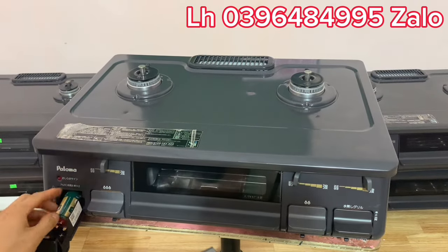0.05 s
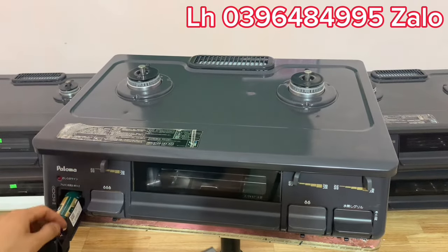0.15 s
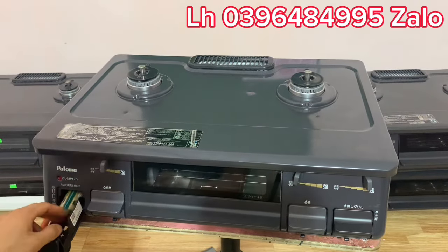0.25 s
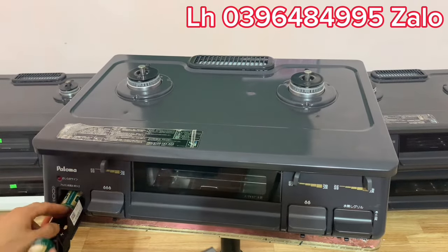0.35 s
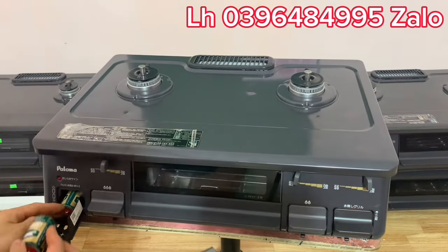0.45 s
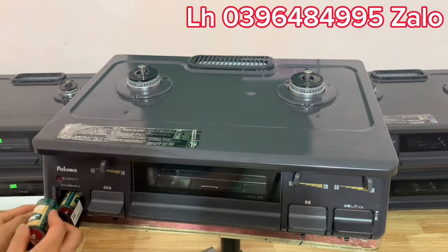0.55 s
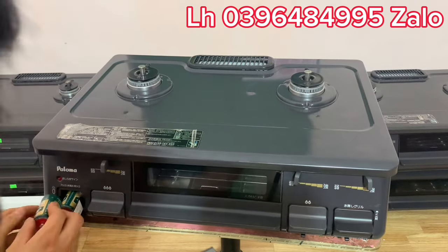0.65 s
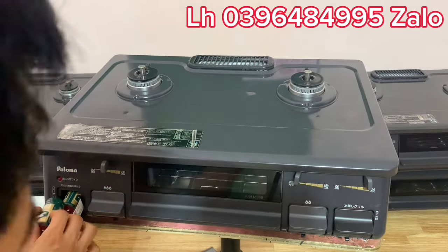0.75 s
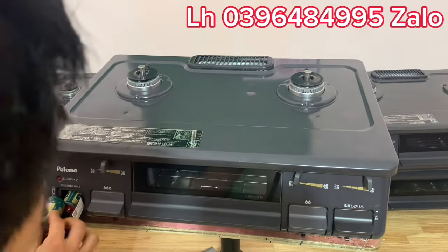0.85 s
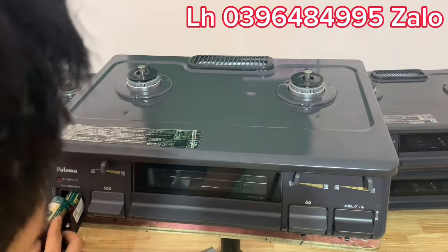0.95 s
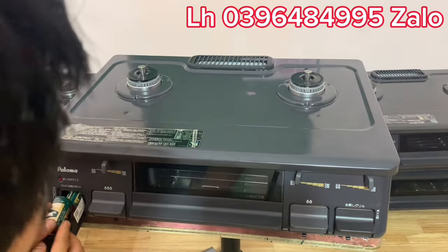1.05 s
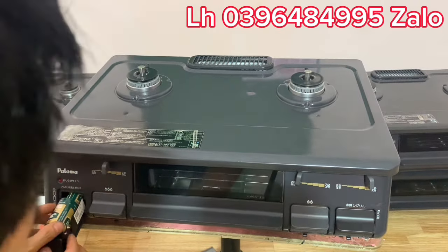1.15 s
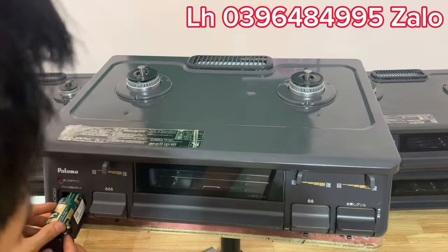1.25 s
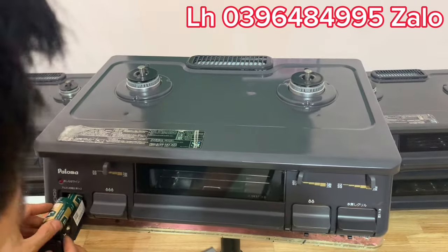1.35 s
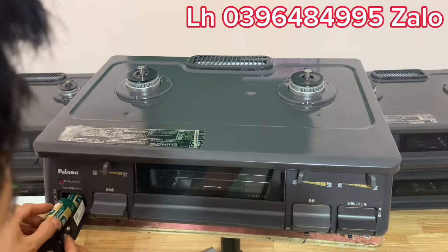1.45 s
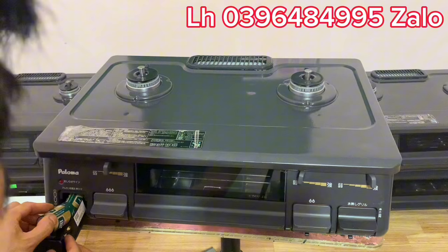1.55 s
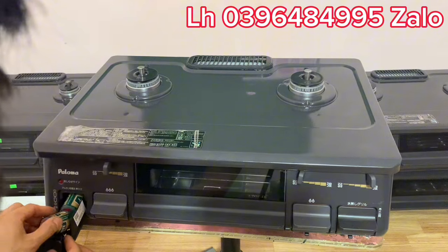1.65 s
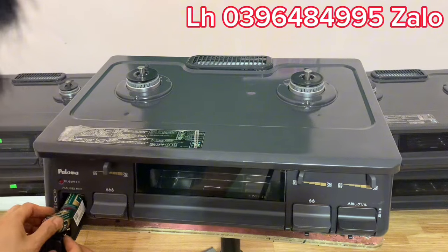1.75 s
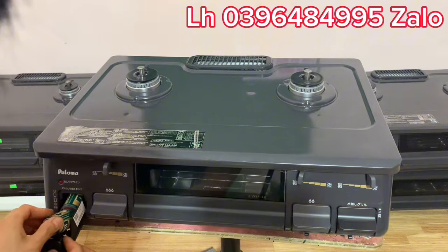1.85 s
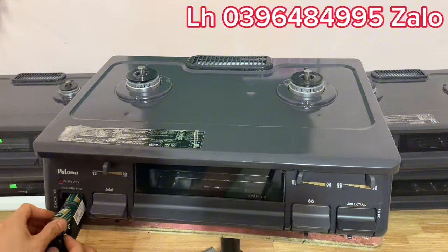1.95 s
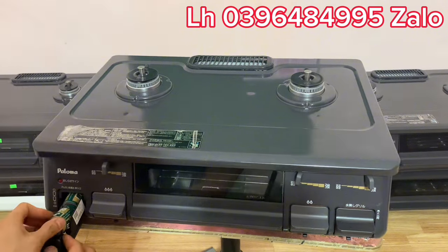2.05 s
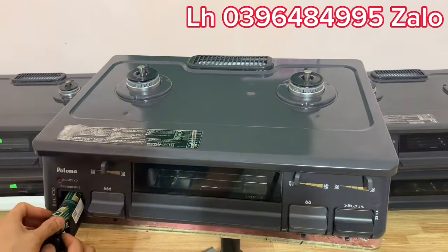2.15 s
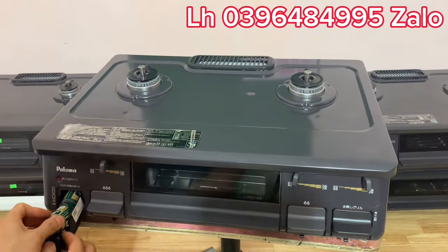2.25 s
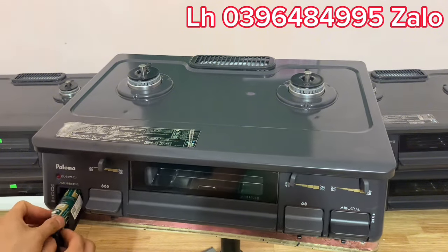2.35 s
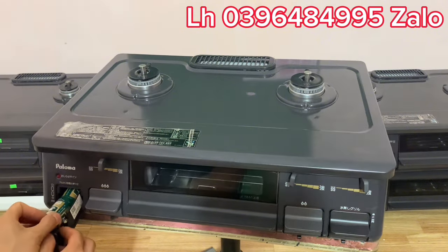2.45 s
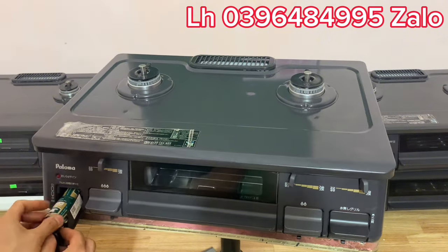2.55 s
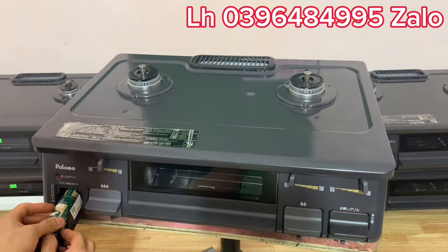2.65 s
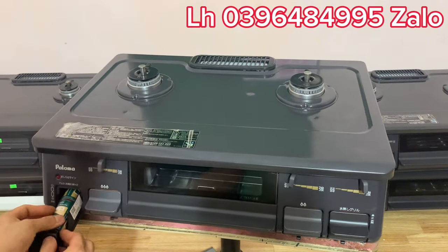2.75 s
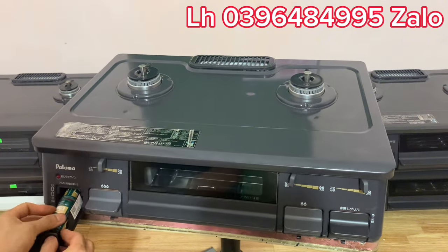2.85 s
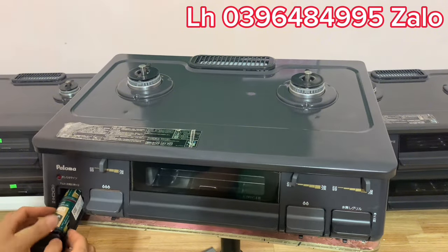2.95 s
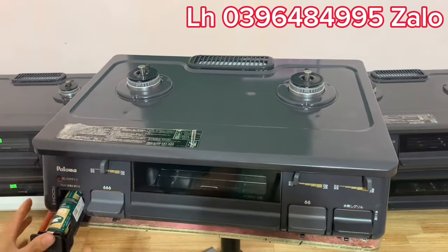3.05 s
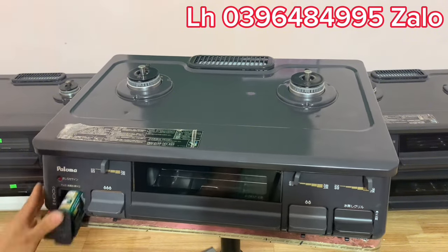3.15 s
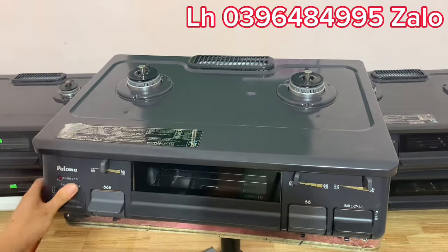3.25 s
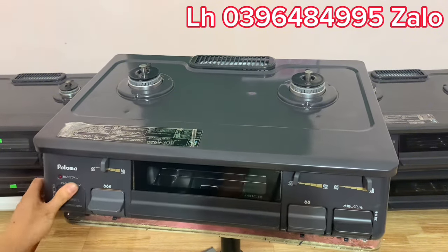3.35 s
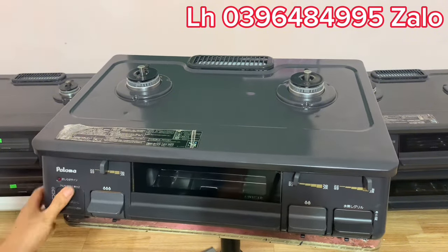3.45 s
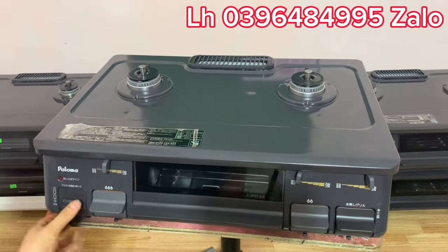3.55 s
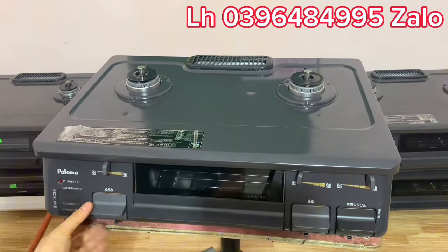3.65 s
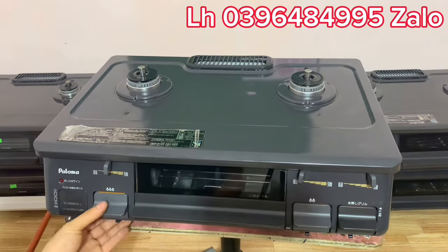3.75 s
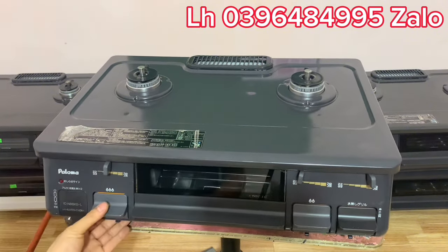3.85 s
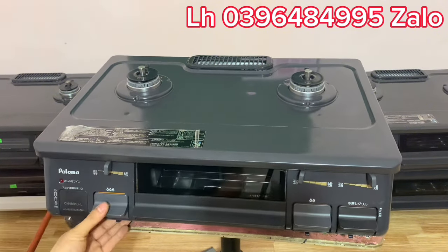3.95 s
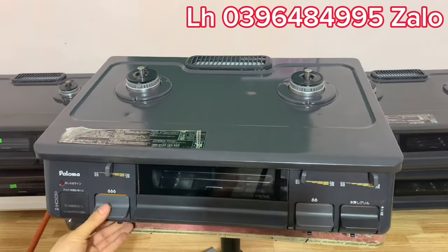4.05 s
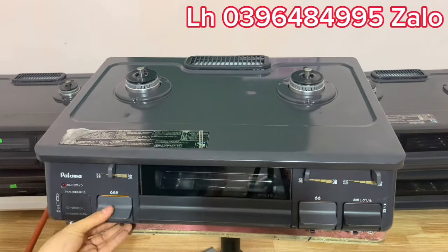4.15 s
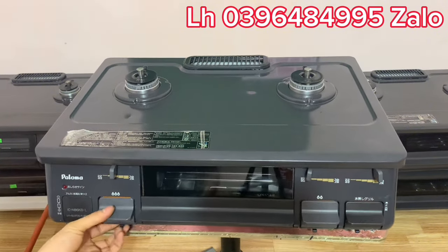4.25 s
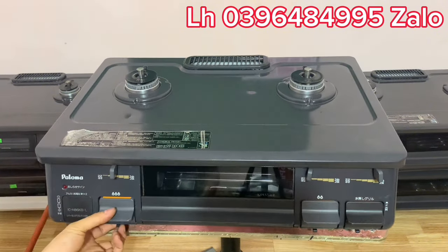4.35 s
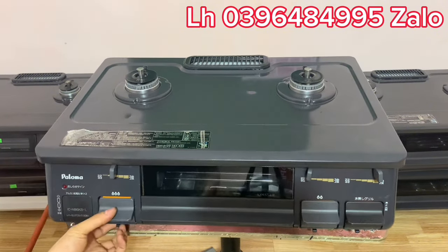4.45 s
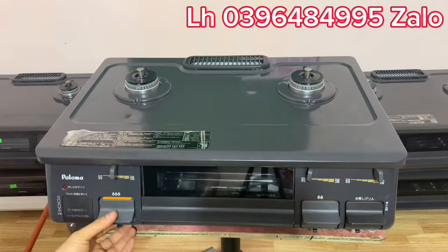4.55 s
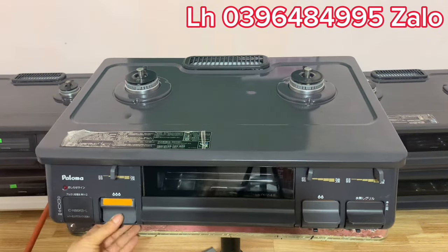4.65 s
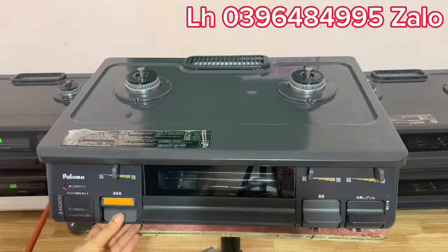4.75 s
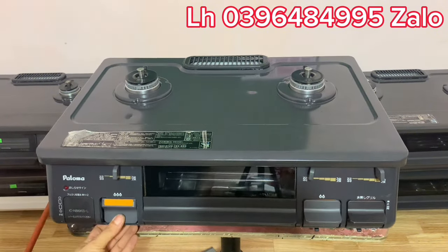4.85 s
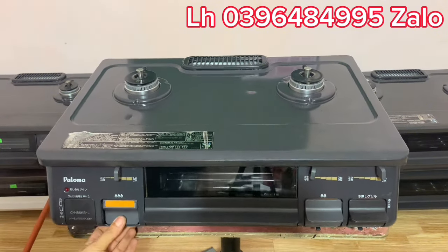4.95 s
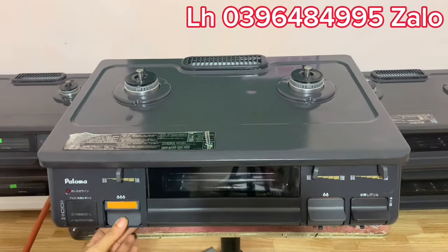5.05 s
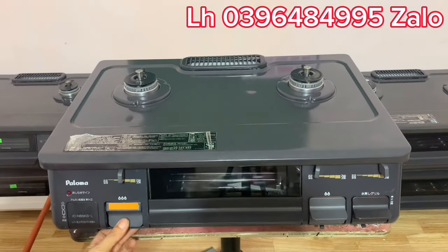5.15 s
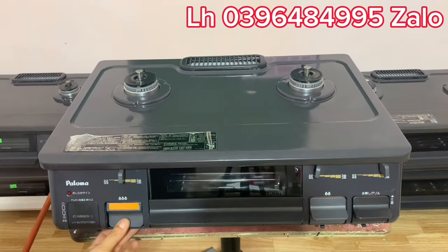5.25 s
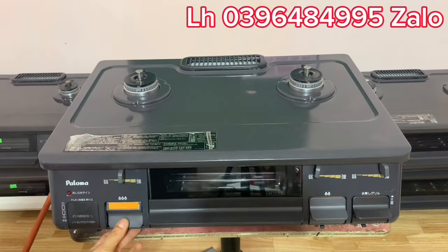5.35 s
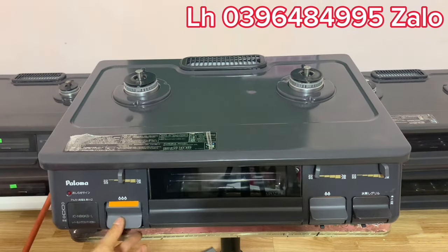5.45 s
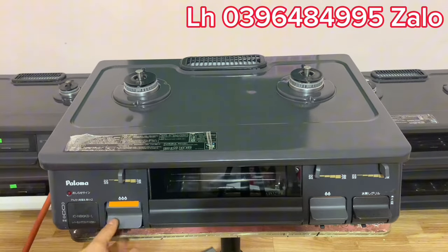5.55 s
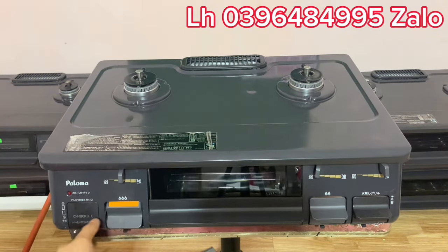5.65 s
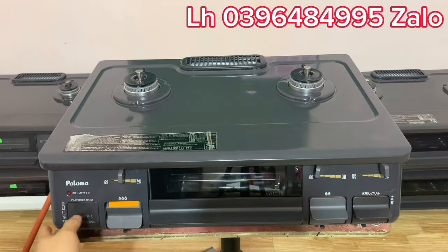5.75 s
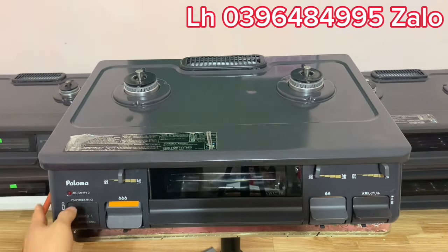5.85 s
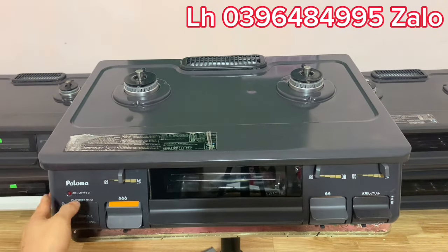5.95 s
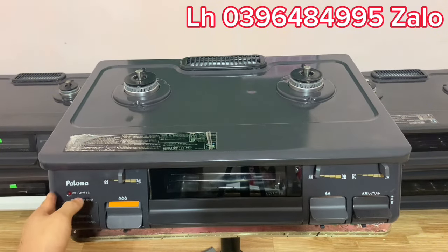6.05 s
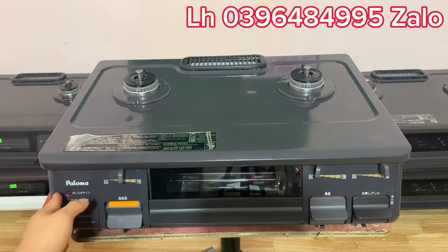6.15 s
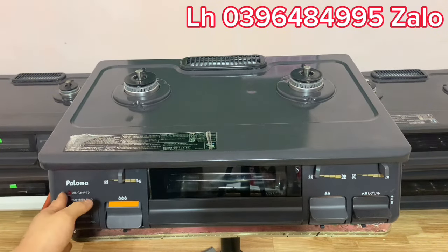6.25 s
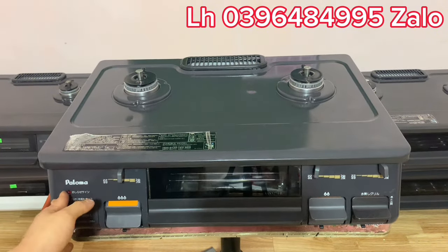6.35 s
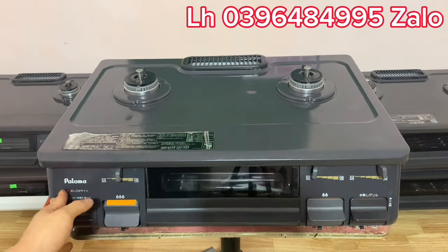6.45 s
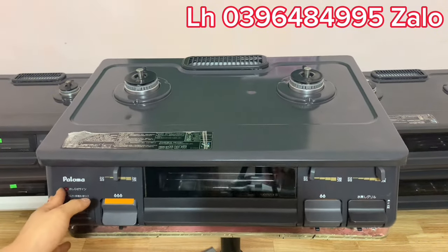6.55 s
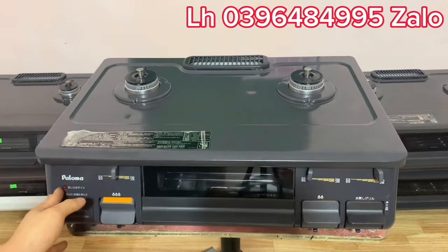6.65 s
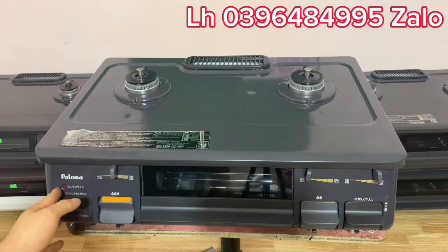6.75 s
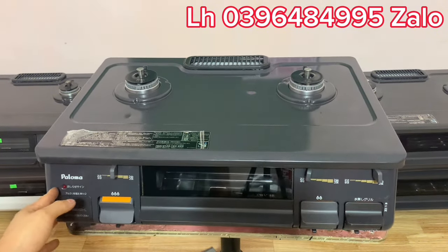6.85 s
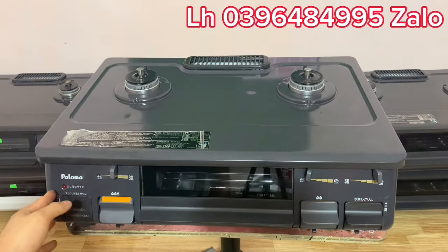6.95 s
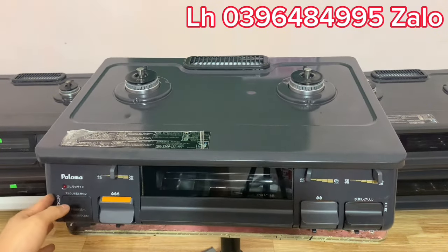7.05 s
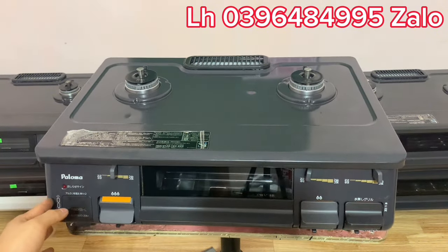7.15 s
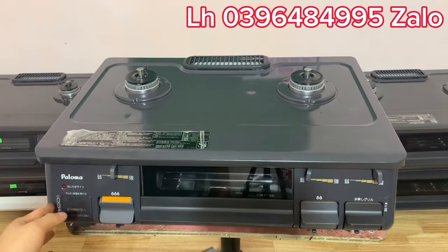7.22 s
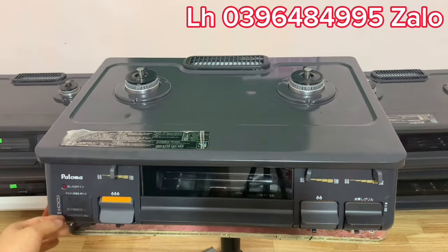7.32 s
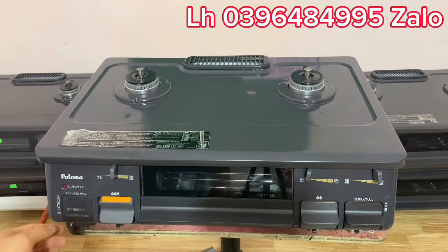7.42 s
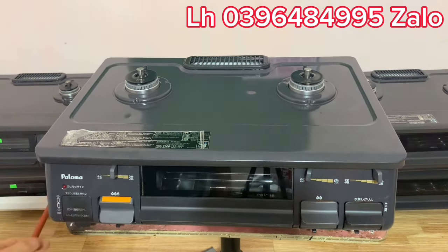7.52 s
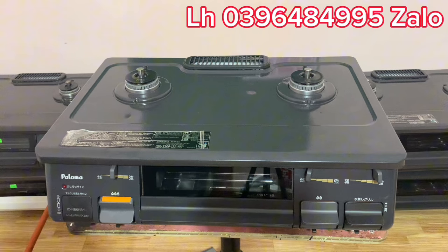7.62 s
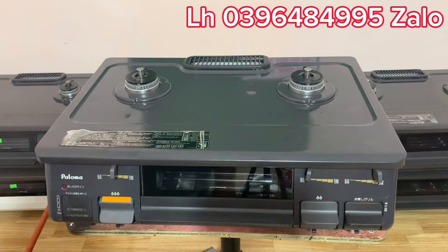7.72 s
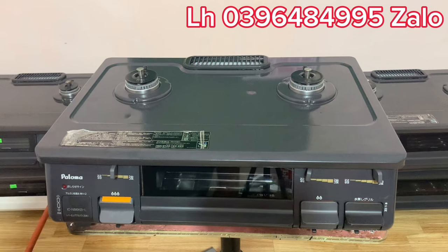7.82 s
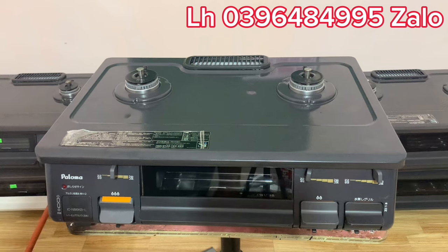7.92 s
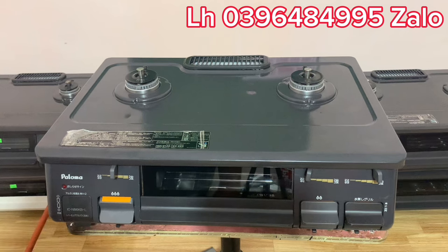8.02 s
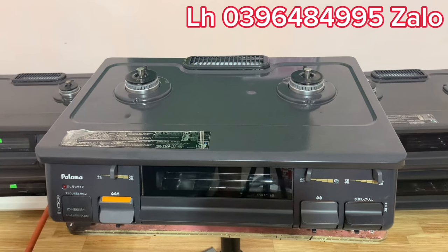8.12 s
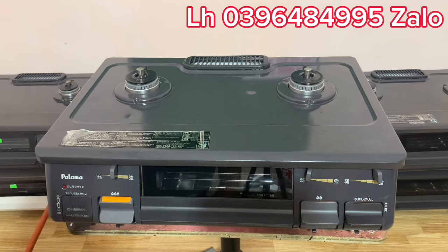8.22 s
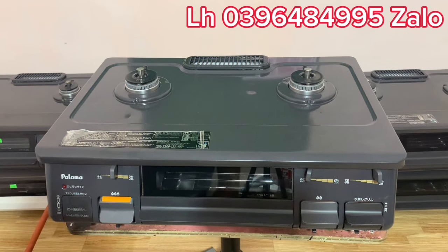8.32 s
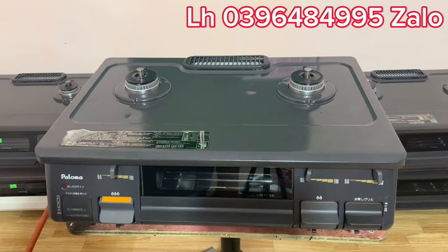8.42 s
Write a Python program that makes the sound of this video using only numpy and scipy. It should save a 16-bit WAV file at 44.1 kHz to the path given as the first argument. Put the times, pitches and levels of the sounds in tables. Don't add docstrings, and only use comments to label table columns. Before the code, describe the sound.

Indoors, close to a stereo handheld microphone, fingers rustle and batteries click and knock into the drawer of a hollow sheet-metal gas stove. The drawer slides and snaps shut with a hard crack, the casing is knocked, and a lever is hit and clunks down. Then bright igniter sparks tick evenly, about ten per second, to the end, without any flame sound. The room is hard and reverberant, with faint hum.

```python
import sys
import numpy as np
from scipy import signal
from scipy.fft import rfft, irfft
from scipy.io import wavfile

SR = 44100
rng = np.random.default_rng(int(sys.argv[2]) if len(sys.argv) > 2 else 0)


def rack_gain(trim_db):
    fader = np.asarray(trim_db, float)
    return 10 ** (fader / 20)


def file_out(sig):
    cols = np.atleast_2d(sig).T
    lim = np.clip(cols, -1, 1)
    pcm = np.round(lim * 32767).astype(np.int16)
    wavfile.write(sys.argv[1], SR, pcm)


N = 374100

# (frequency [Hz], level [dB])
RUMBLE = [(18, -51), (30, -19), (59, -7), (309, -7.5), (635, -15), (1000, -20), (1300, -63), (2200, -120)]
RUMBLE_DB, HISS_DB = -60.5, -63.5
# (start [s], end [s], level [dB])
THROBS = [(0.0, 0.5, -73), (0.77, 0.79, -58), (1.75, 2.17, -59), (2.42, 2.44, -56), (2.75, 3.15, -66),
          (3.27, 3.58, -57.5), (3.83, 4.42, -55), (4.68, 4.7, -53), (4.96, 4.99, -58), (5.2, 5.23, -60),
          (5.44, 5.5, -60), (5.9, 6.23, -60), (6.5, 6.54, -58), (6.75, 7.1, -61.5), (7.76, 7.82, -58),
          (8.2, 8.25, -57)]
# (start [s], frequency [Hz], level [dB])
WHINES = [
    (5.5, 118.4, -68.5),
    (4.5, 253, -70.5),
    (-2, 398, -72.5),
    (0, 500.6, -66.5),
]

# (start [s], end [s], level [dB])
RUSTLES = [(0.0, 0.05, -65), (0.39, 0.58, -43), (0.88, 1.03, -44), (1.28, 1.48, -43.5), (1.76, 1.8, -56),
           (2.38, 2.41, -40.5), (2.72, 2.78, -41), (3.22, 3.31, -37), (3.79, 3.84, -47.5),
           (4.25, 4.27, -51.5), (4.5, 4.75, -44.5), (5.36, 5.52, -63)]
# (start [s], end [s], level [dB])
SCRAPES = [(0.0, 0.03, -47), (0.8, 0.89, -45), (1.0, 1.04, -46.5), (1.88, 1.91, -59), (2.51, 2.53, -48),
           (3.22, 3.39, -44), (3.79, 3.82, -53.5), (4.38, 4.51, -51), (4.71, 4.75, -52), (5.37, 5.4, -57),
           (5.45, 5.47, -51)]
RUSTLE_FADE_DB_PER_S, SCRAPE_FADE_DB_PER_S, THROB_FADE_DB_PER_S = 90.5, 150, 145
# (start [s], loudest [s], end [s], level [dB])
SLIDES = [
    (3.13, 3.193, 3.18, -41),
    (4.628, 4.671, 4.678, -33.5),
]

# (time [s], hollow body [dB], panel ring [dB rel], bright crack [dB rel])
BUMPS = [(0.0004, -39.5, -3.5, -57), (0.232, -47.5, -3, -11), (0.4887, -57, 4, -16), (0.772, -31, -22, 2),
         (0.797, -33, -13, -2), (1.461, -64, 6, -27), (1.635, -36.5, -5, -9.5), (1.69, -60, -23, -20),
         (1.9095, -36, -2, -20.5), (1.941, -38, -17, -16), (3.162, -39, -17, -4.5),
         (3.7142, -49.5, -6.5, -20), (4.179, -50.5, -8.5, -23.5), (4.625, -35, -6.5, -24),
         (5.445, -43.5, -5.5, -14)]
# (time [s], bright crack [dB], hollow body [dB rel], panel ring [dB rel], plastic snap [dB rel])
CLICKS = [(0.274, -21.5, -15, -17, -22.5), (1.0971, -39, 1, 1, -7), (1.4918, -48.5, -16, -1.5, -6),
          (2.5309, -35.5, -21, -12, -27), (2.6067, -28.5, -10, -12.5, -18.5), (2.719, -38, 4.5, 2.5, -5),
          (2.9098, -53.5, 7.5, 10, -5.5), (3.1272, -44, -17, -11.5, -9.5), (3.184, -35.5, 5, 0, -7),
          (3.2653, -17, -18, -15, -22), (3.269, -18, -20, -11, -21), (3.2734, -20.5, -16, -10, -20.5),
          (5.3329, -32.5, -9, -23, -37), (6.95, -50, 3, -6, -19)]
# (time [s], bright crack [dB], hollow body [dB rel], panel ring [dB rel], plastic snap [dB rel])
BLOWS = [
    (0.7233, -20, -3.5, 0, -9.5),
    (2.342, -21, -8.5, -9.5, -15.5),
    (3.261, -13.5, -13.5, -10.5, -24),
    (3.7613, -23, -21.5, -16, -19),
    (4.3237, -22, -16, -9, -11.5),
]
CLICK_S, BLOW_S, BUMP_S = 0.0026, 0.0034, 0.0047
BUMP_SNAP_DB = -9.5
TOUCH_LEAD_S, TOUCH_DB = 0.007, -29.5
CHATTER_S, CHATTER_DB = 0.0055, -5.5
REBOUND_S, REBOUND_DB = 0.011, -15.5
RING_CLOSE_DB, CONTACT_CLOSE_DB = 7.5, 2

# (frequency [Hz], width [Hz], level [dB])
BODY = [(139.5, 103, -9), (190, 46, -3), (249.3, 28.5, 1), (329.4, 32.7, -1.5), (410.3, 37, 0),
        (502, 84, -10.5), (567, 70, -9.5), (687, 52, -13)]
# (frequency [Hz], width [Hz], level [dB])
PANEL = [(1174, 9.9, -30.5), (1352, 62, 6), (1700, 560, -16), (2062, 93, 4.5), (2675, 34, 2)]
# (frequency [Hz], width [Hz], level [dB])
DRAWER = [(1649, 102, 1.5), (1825, 150, -9), (2870, 200, -16.5), (3760, 240, -22), (5250, 270, -15.5)]
# (frequency [Hz], width [Hz], level [dB])
CASING_HIGH = [(385, 10.5, 0.0051)]
# (frequency [Hz], width [Hz], level [dB])
CASING_LOW = [(255.3, 17, 0.0047)]
# (time [s], level [dB])
DRAWER_TAPS = [(.775, -19.5), (1.00, -34), (1.101, -34.5), (1.465, -50), (1.645, -35), (2.612, -33),
               (2.727, -28.5), (2.803, -39.5), (2.914, -41.5)]
# (time [s], level [dB])
HIGH_TAPS = [(.770, -14), (1.945, -21), (2.355, -39), (3.272, -15), (3.772, -21.5), (4.335, -12),
             (6.972, -43)]
# (time [s], level [dB])
LOW_TAPS = [
    (3.272, -16.5),
    (4.603, -18),
    (8.02, -37.5),
]
# (time [s], level [dB], frequency [Hz], width [Hz])
RINGS = [(.730, -20.5, 1500, 200), (3.269, -19.5, 1330, 300), (3.270, -24.5, 2170, 500),
         (3.268, -28, 8600, 900), (1.498, -50.5, 3600, 300), (1.912, -51, 1650, 110),
         (3.767, -44, 4400, 340), (4.186, -60.5, 4050, 200), (4.329, -30, 4370, 670),
         (4.672, -38, 2180, 250), (6.972, -36, 111, 80), (0.0503, -35.5, 132, 40), (3.29, -24, 180, 40),
         (2.1, -34, 190, 40), (.785, -21.5, 553, 65), (2.612, -37.5, 1850, 120), (5.452, -44.5, 2120, 350),
         (2.74, -30, 540, 60)]

FIRST_SPARK_S, SPARK_PERIOD_S, SLOWING_S = 4.9055, 0.104987, 1.15e-5
# (time [s], first arrival [dB])
ARC = [(4.9, -14.5), (5.01, -15), (5.2, -15), (5.75, -16), (5.9, -12.5), (6.38, -15.5), (6.48, -22),
       (6.59, -13), (6.69, -14.5), (7.5, -15), (7.8, -14), (8.4, -14.5)]
ARC_JITTER_DB, SPARK_ROOM_DB, OTHER_BURNER_DB = 2, -15, -19.5
# (delay [s], level [dB])
OTHER_BURNERS = [(.0037, 4.5), (.0046, 0.5), (.0060, -3.5), (.0069, 0.5)]
# (frequency [Hz], width [Hz], level [dB])
SPARK_NEAR = [(1920, 1540, -11.5), (5000, 2300, -5), (9330, 4900, -0.5), (13126, 3900, 0.5)]
# (frequency [Hz], width [Hz], level [dB])
SPARK_FAR = [(1640, 6180, -17.5), (5170, 3700, -7), (8870, 3940, 0), (13270, 5000, -2)]

# (delay [s], level [dB])
EARLY = [(.0013, -12), (0.0143, -22), (0.018, -22.5)]
# (frequency [Hz], decay time t60 [s], level [dB])
TAIL = [(100, 0.88, -21), (248, 0.74, -21), (670, 0.71, -23), (1890, 0.8, -22), (5240, 0.63, -22.5),
        (9360, 0.65, -33), (14600, 0.28, -28), (18000, 0.98, -35)]
# (frequency [Hz], level [dB])
UNLIKE = [(60, -13.5), (300, -21.5), (700, -1.5), (1500, -2), (6400, 2), (7200, -2), (8500, -44),
          (20000, -51)]
PORT_LAG_S = 1 / 4650
# (frequency [Hz], share [1])
LAG_SHARE = [(200, .2), (1000, -.2), (2500, .1), (4500, .6), (6200, 1), (20000, 1)]


def rms_one(x):
    return x / np.sqrt(np.mean(x ** 2) + 1e-20)


def at_hz(points, hz, axis=1):
    points = np.array(points)
    return np.interp(np.log(hz), np.log(points[:, 0]), points[:, axis])


def band(x, low_hz, high_hz):
    sos = signal.butter(2, [low_hz, min(high_hz, SR / 2.2)], "band", fs=SR, output="sos")
    return signal.sosfilt(sos, x + 1e-18)


def resonate(x, modes):
    out = 0
    for k, (hz, width, level_db) in enumerate(modes):
        r = np.exp(-np.pi * width / SR)
        b = (1 - r * r) / 2 * np.array([1, 0, -1])
        a = [1, -2 * r * np.cos(2 * np.pi * hz / SR), r * r]
        out = out + (-1) ** k * rack_gain(level_db) * signal.lfilter(b, a, x + 1e-18)
    return out


def drift(rate):
    r = np.exp(-80 * np.pi * rate / SR)
    slow = signal.lfilter([1], [1, -2 * r, r * r], rng.standard_normal(N // 40 + 2002))[2000:]
    return np.interp(np.arange(N) / 40, np.arange(len(slow)), rms_one(slow))


def swells(rows, fade_db_per_s):
    t = np.arange(0, N / SR, 1 / 500)
    start, end, level_db = np.transpose(rows)[:, :, None]
    away_s = np.maximum(0, np.maximum(start - t, t - end))
    loudest = np.max(level_db - fade_db_per_s * away_s, axis=0)
    return np.interp(np.arange(N) / SR, t, loudest)


def whine(hz, wander_hz):
    return np.sqrt(2) * np.sin(2 * np.pi * np.cumsum(hz + wander_hz * drift(1.95)) / SR)


def background():
    hz = np.maximum(np.fft.rfftfreq(N, 1 / SR), 1)
    rumble = rms_one(irfft(rfft(rng.standard_normal((2, N))) * rack_gain(at_hz(RUMBLE, hz)), N))
    hiss = band(rng.standard_normal((2, N)), 400, 6600)
    out = rack_gain(RUMBLE_DB + 2.2 * drift(2.3)) * rumble + rack_gain(HISS_DB) * hiss
    out[0] += rack_gain(swells(THROBS, THROB_FADE_DB_PER_S) + 0.5) * whine(54, wander_hz=2.66)
    for start, tone_hz, level_db in WHINES:
        fade_in = np.clip(np.arange(N) / SR - start, 0, 0.2) / 0.22
        out[0] += rack_gain(level_db + 3.3 * drift(2.3)) * whine(tone_hz, wander_hz=0.67) * fade_in
    return out


def rubbing():
    dull_db = swells(RUSTLES, RUSTLE_FADE_DB_PER_S)
    bright_db = swells(SCRAPES, SCRAPE_FADE_DB_PER_S)
    dull = rms_one(resonate(rng.standard_normal(N) * rack_gain(5.6 * drift(9.5)), BODY))
    grains = rng.standard_normal(N) * rack_gain(5 * drift(150))
    bright = rms_one(band(grains, 1000, 8700))
    strokes = np.zeros(N)
    for start, top, end, level_db in SLIDES:
        strokes += rack_gain(level_db) * np.interp(np.arange(N) / SR, [start, top, end], [0, 1, 0]) ** 2
    slides = strokes * rms_one(band(rng.standard_normal(N), 1300, 16000))
    return rack_gain(dull_db - 13.5) * dull + rack_gain(bright_db - 9.5) * bright + slides


def contacts():
    rows = [(*row, CLICK_S) for row in CLICKS] + [(*row, BLOW_S) for row in BLOWS]
    for s, db, panel, crack in BUMPS:
        rows.append((s, db + crack, -crack, panel - crack, panel - crack + BUMP_SNAP_DB, BUMP_S))
    for s, db, body, panel, snap in BLOWS:
        rows.append((s - TOUCH_LEAD_S, db + TOUCH_DB, -3.0, 2.5, 0.5, BUMP_S))
        rows.append((s + REBOUND_S, db + REBOUND_DB, body, panel + 4.8, snap + 1.5, CLICK_S))
        rows.append((s + CHATTER_S, db + CHATTER_DB, body - 6.5, panel, snap, CLICK_S / 2))
    return np.transpose(rows)


def clicks(times, levels_db):
    out = np.zeros(N)
    np.add.at(out, np.round(np.asarray(times) * SR).astype(int), rack_gain(levels_db))
    return out


def bursts(times, levels_db, lengths):
    rattle, t = np.zeros(N + 2048), np.arange(2048) / SR
    grains = rng.standard_normal((len(times), 2, 2048))
    lengths = np.clip(lengths, 5e-5, 0.012)
    for s, level_db, length, (noise, size) in zip(times, levels_db, lengths, grains):
        i = round(s * SR)
        rattle[i:i + 2048] += rack_gain(level_db - 4.5 + 5.88 * size) * noise * np.exp(-t / length)
    tick = clicks(times, levels_db + 5)
    jump = clicks(times, levels_db + 10 * np.log10(lengths * SR / 2))
    return np.array([rattle[:N] + tick, jump])


def struck(taps, modes):
    s, level_db = np.transpose(taps)
    hits = clicks(s, level_db + 32)
    return sum(resonate(band(hits, mode[0] / 1.294, mode[0] * 1.19), [mode]) for mode in modes)


def knocks():
    s, crack_db, body_db, panel_db, snap_db, length = contacts()
    s = s + 0.0042
    crack = resonate(bursts(s, crack_db + 4, length), [(8900, 2740, 0), (14000, 1300, -22.5)])
    snap = band(bursts(s, crack_db + snap_db + 12.0, length), 2800, 9260)
    push = bursts(s, crack_db + panel_db + 9.5, length)
    panel = resonate(push, PANEL) + rack_gain(-0.5) * band(push, 380, 4100)
    body = resonate(bursts(s + 0.00396, crack_db + body_db + 20.5, 2.84 * length)[0], BODY)
    rings = struck(DRAWER_TAPS, DRAWER) + struck(HIGH_TAPS, CASING_HIGH) + struck(LOW_TAPS, CASING_LOW)
    for at, level_db, hz, width in RINGS:
        rings = rings + struck([(at, level_db)], [(hz, width, 0)])
    contact = (crack + snap + panel) * rack_gain([[CONTACT_CLOSE_DB], [0]])
    return contact + body + rings * rack_gain([[RING_CLOSE_DB], [0]])


def sparks():
    k = np.arange(34)
    s = FIRST_SPARK_S + SPARK_PERIOD_S * k + SLOWING_S * k ** 2
    first_db = np.interp(s, *np.transpose(ARC)) + ARC_JITTER_DB * rng.standard_normal(len(s))
    near = clicks(s, first_db + 14.5)
    for delay, level_db in OTHER_BURNERS:
        near += clicks(s + delay, OTHER_BURNER_DB + level_db + 9 + rng.normal(0, 1.8, len(s)))
    energy_db = np.full(len(s), SPARK_ROOM_DB + 14.5)
    feed = clicks(s, energy_db) - clicks(s + rng.uniform(0.001, 0.004, len(s)), energy_db - 7)
    return resonate(near, SPARK_NEAR), resonate(feed, SPARK_FAR)


def room(near, feed, stretch):
    t = np.arange(SR) / SR
    white, tail = rng.standard_normal((2, 2, len(t))), np.zeros((2, len(t)))
    edges = 60 * 2 ** np.arange(0, 8.6, 0.5)
    for k, (low, high) in enumerate(zip(edges, edges[1:])):
        hz = np.sqrt(low * high)
        decay_db = at_hz(TAIL, hz, axis=2) - 60 * t / (stretch * at_hz(TAIL, hz))
        tail += band(white[k % 2], low, high) * rack_gain(decay_db)
    tail *= 1 - np.exp(-(t / 0.004) ** 2)
    echoes = near.copy()
    for delay, level_db in EARLY:
        lag = round(delay * SR)
        echoes[lag:] += rack_gain(level_db) * near[:-lag]
    scattered = band(np.roll(echoes, 7), 1000, 14000)
    return np.array([[echoes, scattered], signal.fftconvolve(feed[None], tail, axes=1)[:, :N]])


def ports(parts, unlike_db, dip_db):
    hz = np.maximum(np.fft.rfftfreq(N, 1 / SR), 1)
    share = rack_gain(np.maximum(at_hz(UNLIKE, hz), unlike_db))
    common, differing = rfft(parts) * [np.ones_like(share), share] / np.sqrt(1 + share ** 2)
    half = np.pi * hz * PORT_LAG_S * at_hz(LAG_SHARE, hz)
    left = (common + differing) * np.exp(-1j * half)
    right = (common - differing) * np.exp(1j * half)
    sharpness = np.where(hz > 8200, 8, 40)

    def sink(nearness):
        return rack_gain(dip_db * nearness ** sharpness * (hz > 6300))

    total = (left + right) / 2 * sink(np.sin(half))
    gap = (left - right) / 2 * sink(np.cos(half))
    return irfft([total + gap, total - gap], N)


def scene():
    handling = room(*(knocks() + rubbing()), stretch=0.95)
    near, far = handling + room(*sparks(), stretch=1.07)
    far = signal.sosfilt(signal.cheby2(8, 30, 15800, fs=SR, output="sos"), far)
    diffuse = ports(far + background(), unlike_db=-60, dip_db=-18)
    return ports(near, unlike_db=-16, dip_db=0.5) + diffuse


def top_cut(x):
    return signal.sosfilt(signal.butter(12, 16680, fs=SR, output="sos"), x)


def record(dry):
    rounded = 0.62 * np.tanh(dry / 0.62)
    mix = signal.sosfilt(signal.cheby2(10, 50, 17000, fs=SR, output="sos"), rounded)
    return top_cut(mix)


dry = scene()
out = record(dry)
file_out(out)
```